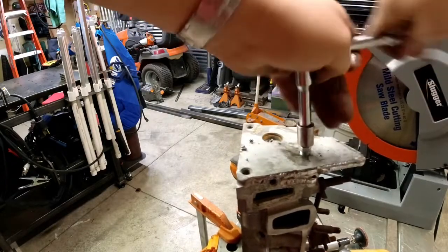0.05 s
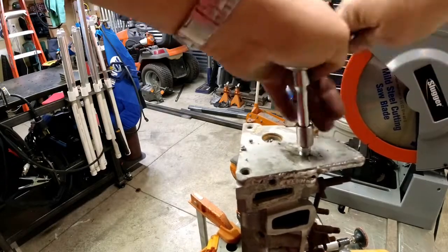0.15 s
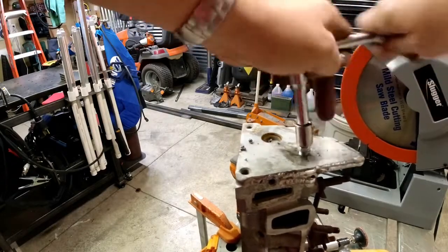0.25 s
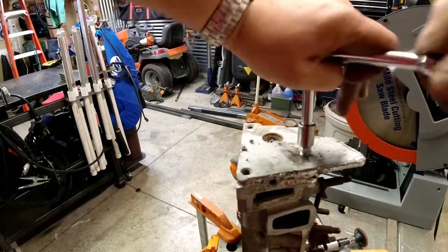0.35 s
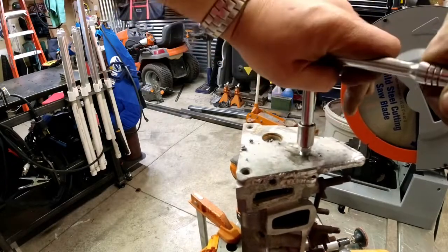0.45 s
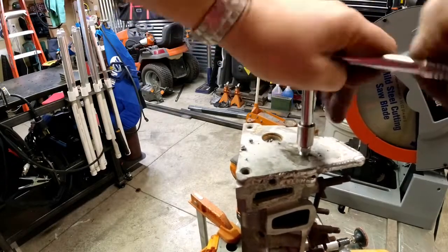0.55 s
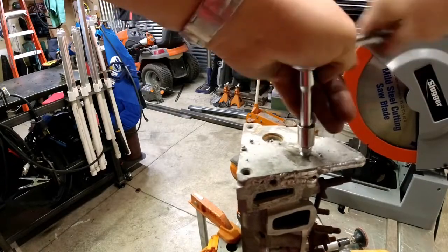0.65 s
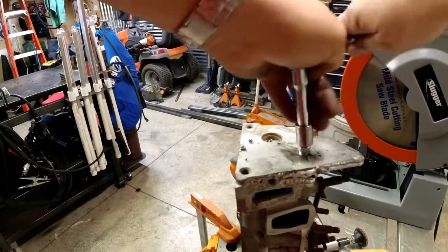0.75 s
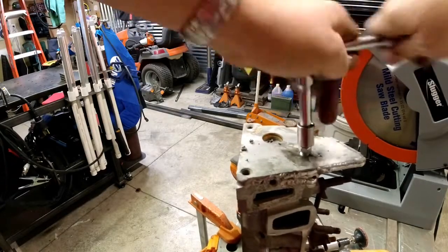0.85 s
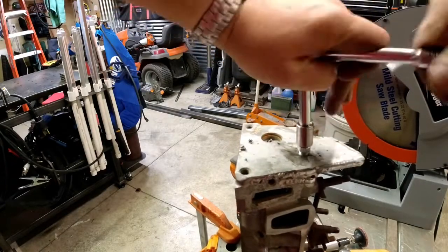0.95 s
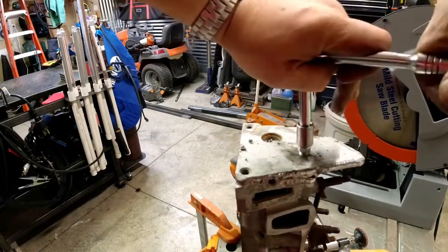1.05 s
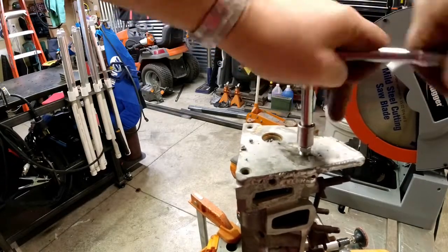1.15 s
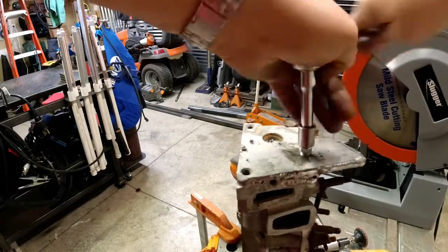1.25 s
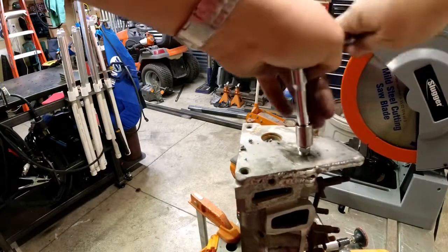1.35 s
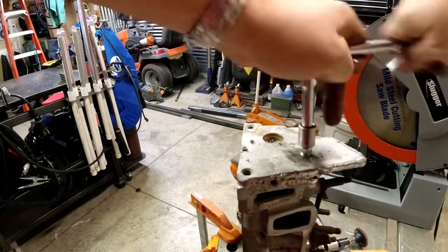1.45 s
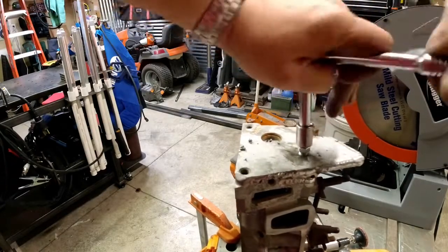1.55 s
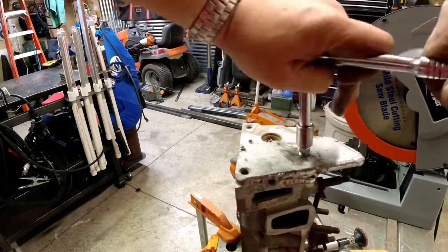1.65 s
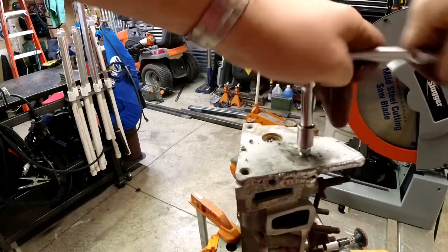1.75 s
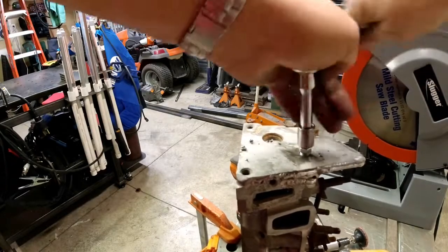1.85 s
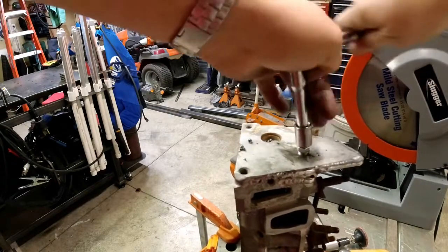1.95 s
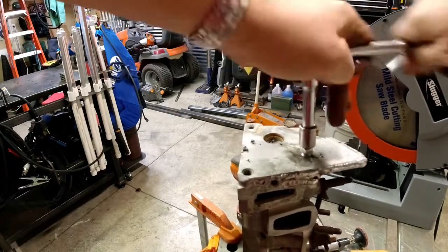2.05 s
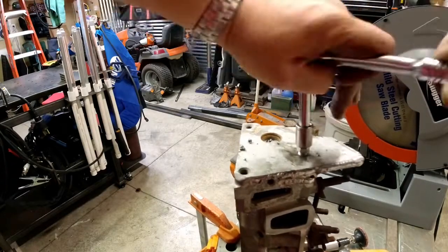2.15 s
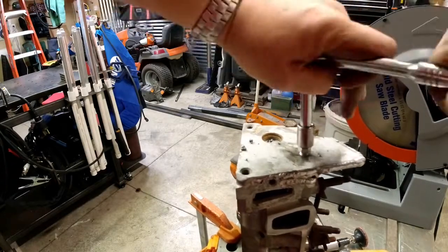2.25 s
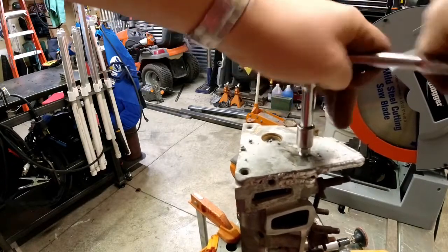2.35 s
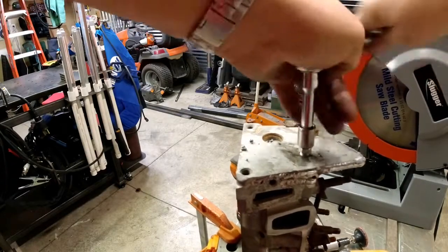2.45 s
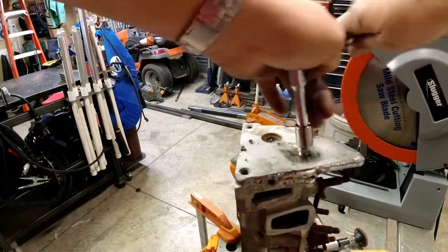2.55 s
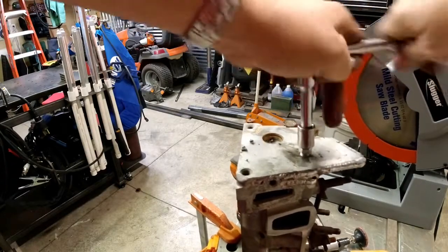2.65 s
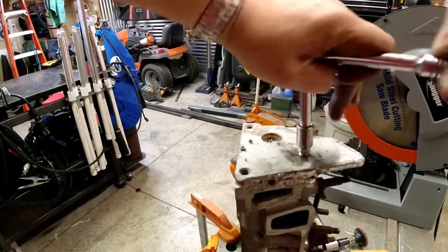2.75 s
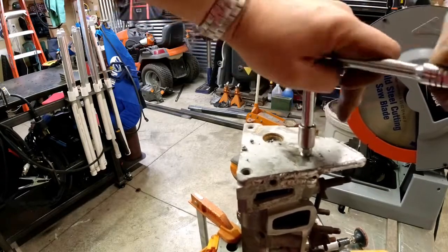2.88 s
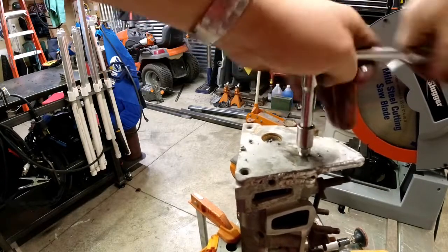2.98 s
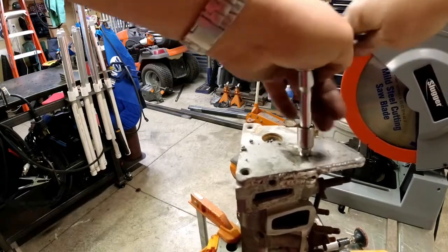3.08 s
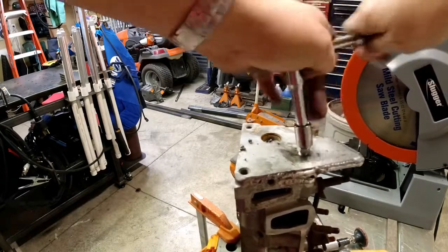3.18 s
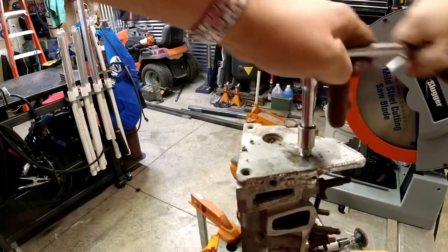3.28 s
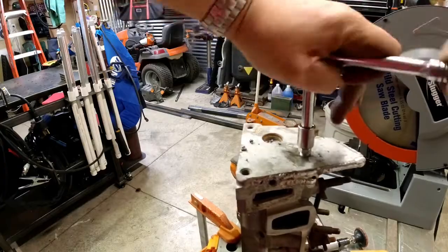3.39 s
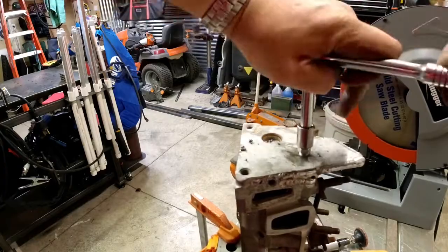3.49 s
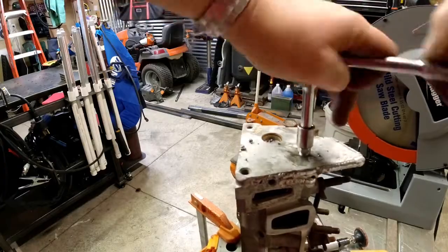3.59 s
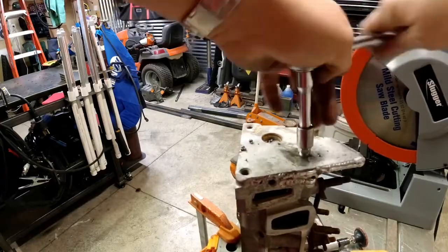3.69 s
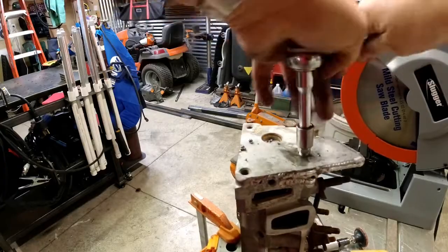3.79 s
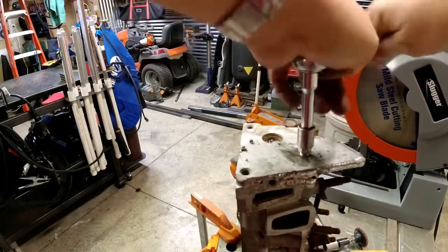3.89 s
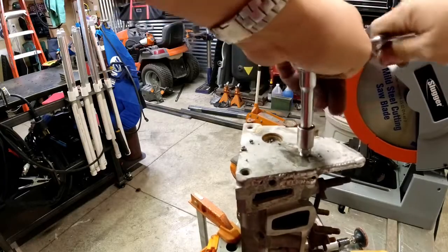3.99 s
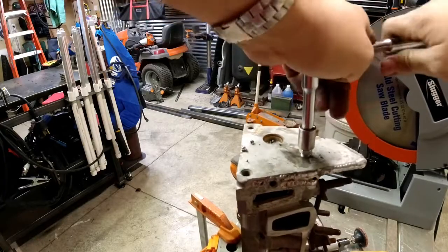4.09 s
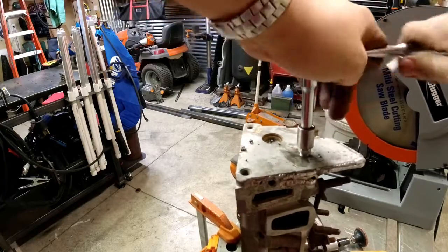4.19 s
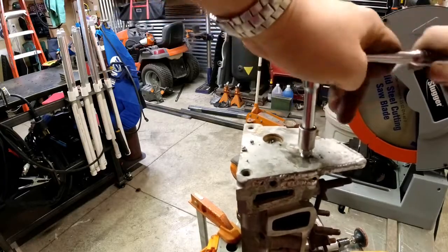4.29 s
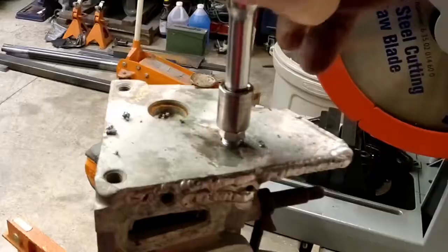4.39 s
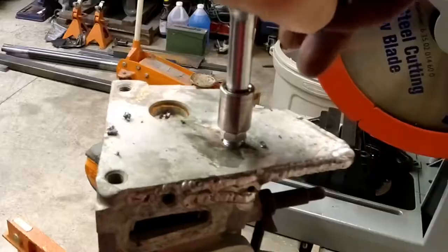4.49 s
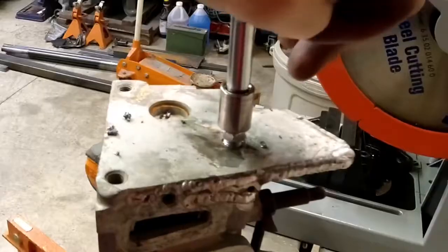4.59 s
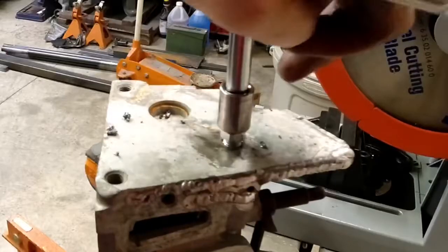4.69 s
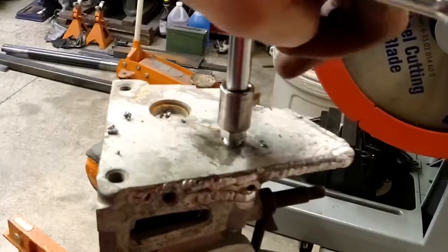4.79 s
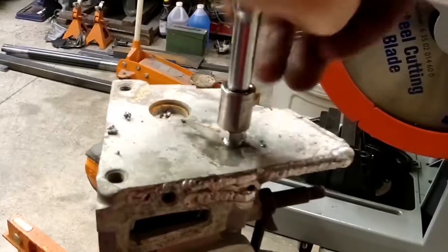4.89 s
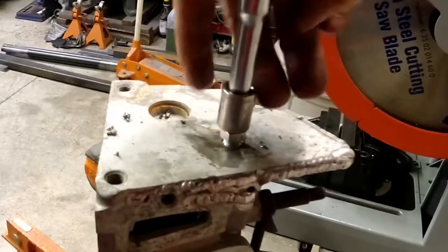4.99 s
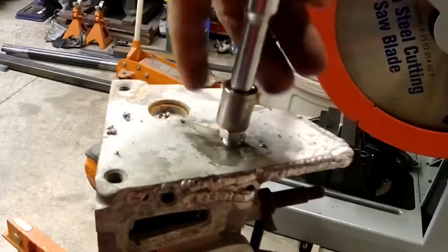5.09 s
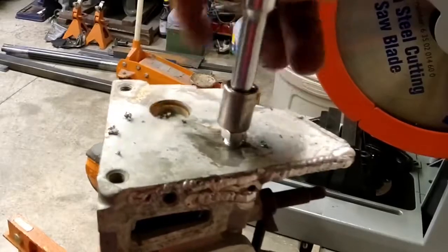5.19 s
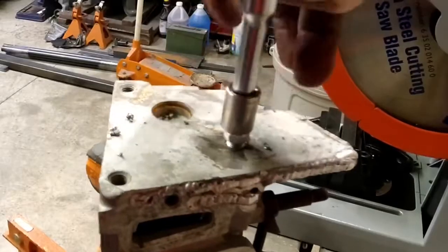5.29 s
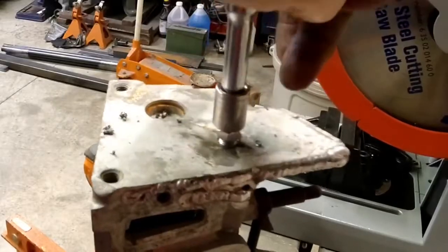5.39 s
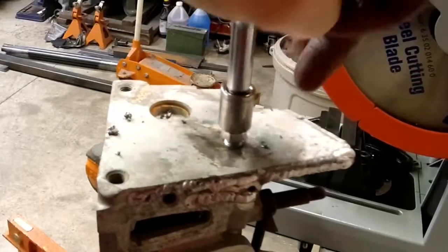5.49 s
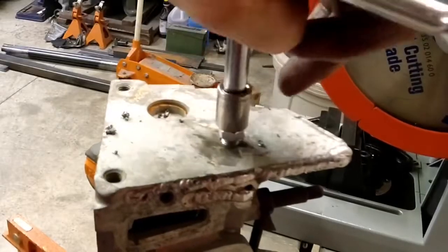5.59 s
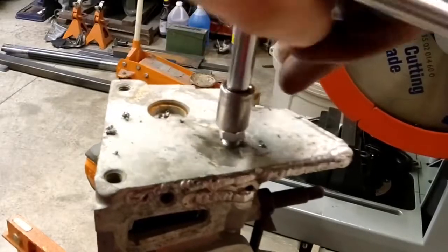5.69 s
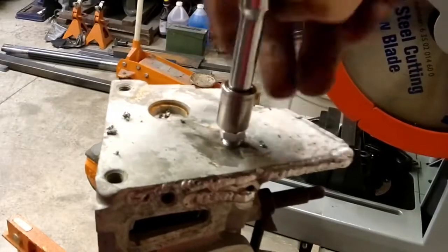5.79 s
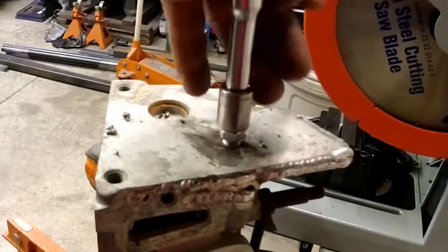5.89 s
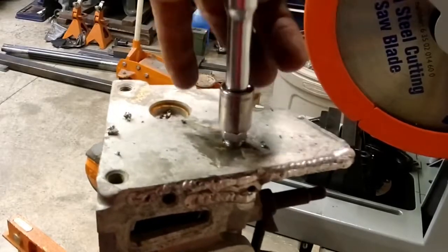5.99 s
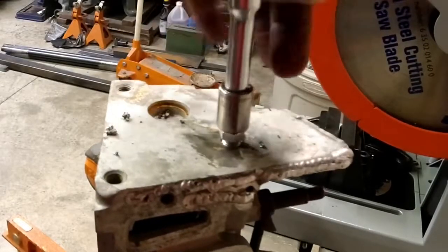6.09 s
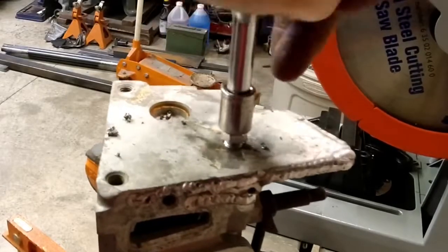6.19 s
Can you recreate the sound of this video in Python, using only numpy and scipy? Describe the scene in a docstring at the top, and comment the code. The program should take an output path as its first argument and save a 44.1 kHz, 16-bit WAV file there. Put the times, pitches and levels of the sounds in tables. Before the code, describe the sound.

Short bright zips of ratchet clicks repeat about twice a second, pause, then return slightly slower, amid dull metal clunks and low air thumps.

```python
"""Bursts of sharp metal clicks: a hand ratchet drives a bolt into a metal casting on a garage bench.
On each return swing the pawl skips over the teeth; each drop is shaped noise plus the ringing head.
Socket and extension bar knock as the load turns over, with noise and ringing tones; the thread grinds.
A sleeve brushes past as soft hiss, and the swinging arm pushes air at the microphone in low wobbles.
A short echo follows the tool, over a faint murmur and garage hush."""
import sys
import numpy as np
from scipy import signal
from scipy.fft import rfft, irfft, next_fast_len
from scipy.io import wavfile
from scipy.ndimage import uniform_filter1d

SR = 44100
rng = np.random.default_rng(int(sys.argv[2]) if len(sys.argv) > 2 else 0)


def pcm_store(signal):
    """Save signal as 16-bit PCM."""
    levels = np.round(np.clip(np.atleast_2d(signal), -1, 1) * 32767)
    wavfile.write(sys.argv[1], SR, levels.astype(np.int16).T)


N = 275184

# Levels in the tables are starting points: each function adds its own trims.

# Pawl dropping behind a tooth: start_s, blow_db, ring_db, place struck along the head (0-1),
# clack_pitch_hz, ring_length (share of the head's usual ring)
PAWL_DROPS = [(.058, -32.5, -24, 0.1, 4800, 1.8), (0.072, -32, -39, 0.3, 5400, .9),
              (.075, -35, -29.5, 0.2, 5630, 2.6), (0.085, -36, -28.5, 0.78, 4940, 0.77),
              (0.0899, -31, -34.5, 0.82, 5550, 0.85), (0.0975, -27, -32.5, .2, 5200, 1.3),
              (0.1117, -28.5, -26, 0.47, 5030, 1.4), (0.119, -40, -46.5, 0.8, 2700, .9),
              (0.1234, -27, -28, 0.6, 2390, 0.8), (0.1386, -32, -25, 0.2, 2650, 0.67),
              (0.1564, -28, -27.5, 0.56, 3880, 0.91), (0.6241, -31, -30, 0.67, 5100, .9),
              (.63, -34.5, -42.5, .17, 3400, 0.98), (0.6408, -30, -27, 0.64, 5150, 0.97),
              (0.654, -33, -28, 0.84, 5600, 1.1), (0.6675, -33.5, -32, 0.46, 2210, 1.2),
              (0.6806, -33, -28, 0.53, 4970, 1.44), (.693, -29.5, -34, .8, 4040, 1),
              (0.707, -27.5, -24.5, 0.1, 4660, 0.41), (0.7263, -29, -25.5, 0.63, 4330, 0.5),
              (.764, -28, -16.5, 0.18, 2250, 0.13), (1.2011, -31, -52, .15, 4220, 1.3),
              (1.215, -32.5, -45, 0.6, 4340, 1.4), (1.2222, -30, -31.5, 0.77, 3970, 1.7),
              (1.2365, -32.5, -36, 0.13, 5130, 0.95), (1.249, -28.5, -34.5, 0.6, 5000, 1.4),
              (1.26, -30, -30, 0.52, 5200, 2), (1.273, -36.5, -25.5, 0.1, 5100, 1.3),
              (1.2866, -33, -25, 0.19, 5800, 1.3), (1.3009, -32.5, -19.5, 0.16, 5900, 0.97),
              (1.323, -30, -20.5, 0.09, 5300, 0.96), (1.803, -29.5, -25.5, 0.24, 4700, 1.24),
              (1.8161, -29.5, -22, .78, 5340, 1.25), (1.8295, -31, -28, 0.9, 4100, 1.5),
              (1.841, -31, -28.5, 0.03, 1940, 3.1), (1.854, -29.5, -29.5, 1, 5540, 2.1),
              (1.869, -26.5, -27.5, 0.17, 1900, 1), (1.8833, -30, -19.5, .17, 1660, 1.35),
              (1.904, -29.5, -24.5, 0.15, 3700, 0.73), (2.409, -31, -22.5, 0.14, 4600, 0.93),
              (2.4252, -36, -27, 0.89, 4860, 1.2), (2.438, -31.5, -31, 0.85, 5100, 1.7),
              (2.4508, -32, -33.5, 0.42, 4080, 1.4), (2.4655, -36, -24.5, 0.99, 2180, 0.58),
              (2.478, -31.5, -28.5, 0.08, 1950, 1), (2.494, -31, -24, 0.15, 2470, 0.8),
              (2.515, -30, -22.5, 0.15, 2900, 0.98), (2.5648, -35.5, -28.5, 0.95, 5640, 0.57),
              (2.9895, -36.5, -46, .17, 3400, 1.3), (3.0125, -28.5, -35, 0.2, 4530, 1.3),
              (3.028, -43, -24.5, 0.82, 5240, 0.96), (3.04, -29.5, -36, 0.8, 5170, 1),
              (3.0465, -26.5, -30.5, 0.3, 5500, 0.8), (3.055, -31, -28.5, 0.5, 5380, 1.4),
              (3.0591, -29.5, -36, 0.4, 5660, 1.5), (3.0695, -26.5, -43.5, 0.5, 5500, 0.53),
              (3.0729, -28.5, -30, 0.36, 3860, 0.68), (3.087, -28, -32.5, .8, 5200, 0.69),
              (3.106, -28.5, -24, 0.8, 2180, 1.08), (3.1324, -28.5, -24, 0.96, 5110, 0.47),
              (3.6639, -32, -24.5, 0.88, 5070, .9), (3.68, -31.5, -20, 0.89, 4400, 1.26),
              (3.697, -33.5, -31, 0.37, 1850, 1.3), (3.7122, -33, -26.5, 0.12, 2100, 2.1),
              (3.7291, -30, -34.5, 0.64, 5300, 1.6), (3.749, -32.5, -25.5, 0.12, 5930, 1.3),
              (3.785, -29, -23.5, 0.11, 2220, 0.47), (3.9011, -32.5, -29.5, 0.52, 2860, 0.2),
              (4.947, -37, -69, .18, 4440, .9), (4.9675, -31.5, -34, 0.07, 4070, 1.7),
              (4.986, -37, -29.5, 0.47, 5540, 0.99), (5.003, -28.5, -38.5, 1, 2570, 1.6),
              (5.021, -27.5, -26.5, 0.01, 5180, 1.1), (5.039, -30, -28.5, .04, 5220, 1.4),
              (5.0558, -29, -25.5, 0.16, 5640, 1.8), (5.0729, -28, -22.5, 0.7, 4130, 1.17),
              (5.0887, -26, -30, 0.7, 4200, 1.5), (5.0966, -31, -40, 0.36, 3270, 0.94),
              (5.112, -28, -30.5, 0.62, 3490, 1.1), (5.1472, -28.5, -21.5, 0, 5430, 0.49),
              (5.8214, -35, -33, .16, 3370, 1.7), (5.8384, -36, -29.5, 0.69, 5300, 0.75),
              (5.8566, -31.5, -27, 0.36, 5150, 0.46), (5.8742, -34, -33, 0.47, 4400, 2.2),
              (5.8916, -34, -31, 0.51, 4100, 2.2), (5.9086, -30.5, -26, 0.75, 4100, 1.1),
              (5.925, -31.5, -24.5, 0.13, 4360, 1.75), (5.942, -31, -27, 0.17, 4000, 1.6),
              (5.9666, -35.5, -21.5, 0.18, 2830, 0.79)]
# Ring of the ratchet head, damped fast while the pawl bears on it:
# pitch_hz, t60_s (time to fall 60 dB), after_ring_t60_s (a fainter, usually longer ring)
HEAD_MODES = [(3714, 0.018, 0.036), (6816, 0.022, 0.84), (9590, 0.0023, 0.032), (10880, 0.012, 0.051),
              (15250, 0.008, 0.039), (9905, 0.011, 0.026), (5300, 0.013, 0.4)]
# How the first five head modes lie along the head: half_waves, loudest_place (0-1), level_db
HEAD_SHAPES = [(2.2, 0.17, -6.5), (2.06, .32, -7), (3.3, 0.05, 0), (1.59, .46, 3), (.51, .62, -5.5)]
# Colour of the snap in each click: pitch_hz, level_db
SNAP_TONE = [(800, -32), (2500, -6), (4300, 1.5), (5300, -3), (8000, -3), (10000, -23.5), (16500, -59)]
# Colour of the duller thud: pitch_hz, level_db
THUD_TONE = [(400, -32), (900, -4), (1400, -1.5), (2200, -1), (3100, -10), (8000, -60.5)]
# Colour of the bright crack: pitch_hz, level_db
CRACK_TONE = [(7000, -24.5), (8600, 3), (12000, -5), (13500, -11), (15600, -9), (16300, -35.5),
              (17000, -41)]
# Colour of the gritty noise in the knocks and just before each click: pitch_hz, level_db
SCRAPE_TONE = [(300, -22), (900, 1), (2000, -0.5), (4000, 1.5), (7000, -8.5), (10000, -21), (15000, -29.5)]
NODE_LEAK = 0.011  # share of a mode still heard when struck on a node, its still point
CLACK_DB, CLACK_T60_S = 14.5, 0.0065  # level above the blow
THUD_DB, THUD_DB_PER_OCTAVE = -5.5, -1.5  # the thud weakens as the clack gets lower
SWELL_DB, SWELL_S = -20, 0.0078  # faint noise swelling just before each click
BRIGHT_SWELL_DB = -27  # level of the bright noise swelling just before each click
DETUNE = .004  # spread of mode pitch from tooth to tooth, as a share at 9000 Hz
FLUTTER_DB = 6  # the loose pawl chatters on the head and breaks up its after-ring
HEAD_WANDER_RAD = 0.63  # loose contact shakes the phase of the head's ring
ONSET_S = 0.00056  # each click starts with a brief smooth rise
RATTLE_DB, RATTLE_T60_S = -27, 0.15  # loose parts in the head rattle on after a drop


def pawl():
    """Each drop is a short snap, clack and thud; the head rings in a blend set by where the tooth strikes."""
    out, t = np.zeros(N), np.arange(8000) / SR
    chatter = amp(FLUTTER_DB * lumps(size=150))
    before = np.arange(-900, 0) / SR  # time leading up to the click
    shake = HEAD_WANDER_RAD * lumps(size=120)
    onset = 1 - np.exp(-(t / ONSET_S) ** 2)
    half_waves, loudest, shape_db = np.transpose(HEAD_SHAPES)
    for s, blow_db, ring_db, place, clack_hz, share in PAWL_DROPS:
        detune, phases, luck, grip = rng.standard_normal((4, len(HEAD_MODES)))
        share = np.clip(share, .2, 3)
        reach = abs(np.cos(np.pi * half_waves * (place - loudest)))
        mode_db = ring_db + shape_db + 20 * np.log10(reach + NODE_LEAK)
        bright_db = max(mode_db[2:4])  # a sharp strike wakes the upper modes and the crack together
        # the last two modes follow the third mode and the blow, with some chance
        mode_db = [*mode_db, mode_db[2] - 0.5 + 3 * luck[1], blow_db - 12.5 + 5 * luck[2]]
        flutter = excerpt(chatter, len(t))

        swell = amp(blow_db + SWELL_DB) * hiss(SCRAPE_TONE, count=900)
        swell += amp(bright_db + BRIGHT_SWELL_DB) * hiss(CRACK_TONE, count=900)
        add(out, s + before[0], swell * np.exp(before / SWELL_S) * flutter[-900:])

        # a hard spike and a longer body
        blow = fade(t, 0.011, 0.00057) + 2.4 * fade(t, 0.0037, 0.00052)
        # the sprung pawl rebounds weakly, a few milliseconds later
        for wait, size in rng.random((3, 2)):
            since_rebound = np.maximum(t - .0015 - 0.0063 * wait, 0)
            blow = blow + 0.23 * min(share, 1) * size * fade(since_rebound, 0.0035, 0.00012)

        rattle = amp(RATTLE_DB) * fade(t, RATTLE_T60_S, .002) * flutter
        sound = amp(blow_db + 3.5) * hiss(SNAP_TONE, count=len(t)) * (blow + rattle)
        clack = np.sin(2 * np.pi * clack_hz * t) * fade(t, CLACK_T60_S, 0.00059)
        sound += amp(blow_db + CLACK_DB) * clack
        sound += amp(bright_db - 3.0) * hiss(CRACK_TONE, count=len(t)) * blow
        thud_db = blow_db + THUD_DB + THUD_DB_PER_OCTAVE * np.log2(5000 / clack_hz)
        thud_tail = 0.55 * min(share, 1) * fade(t, 0.11, 0.014) * flutter
        sound += amp(thud_db) * hiss(THUD_TONE, count=len(t)) * (blow + thud_tail)

        for (hz, t60, late), db, d, phase, g in zip(HEAD_MODES, mode_db, detune, phases, grip):
            # every tooth seats a little differently, so each mode rings its own length and strength
            shape = fade(t, t60 * share * 1.31 ** g, 0.0012)
            shape += 0.012 * share ** 2 * fade(t, late, 0.0011) * (1 - t / t[-1]) * flutter
            tuned_hz = hz * (1 + DETUNE * d * np.sqrt(9000 / hz))
            tone = np.sin(2 * np.pi * (tuned_hz * t + phase) + excerpt(shake, len(t)))
            sound += amp(db + 11 + 1.4 * g - 3 * np.log10(share)) * tone * shape
        add(out, s - .0008, sound * onset)
    return out


# Slack in the socket taken up: start_s, tick_db, scrape_db, bump_db,
# centre_hz (where the casting answers most)
SOCKET_KNOCKS = [(0.0044, -30, -35, -50, 2090), (0.0339, -27.5, -32.5, -64, 1300),
                 (0.2528, -32.5, -30.5, -50.5, 1180), (0.2733, -24.5, -38, -52, 756),
                 (0.4615, -51, -42, -80, 655), (0.553, -40, -34, -43, 1130), (0.599, -30, -27, -49, 1010),
                 (.745, -26, -59, -75, 1980), (0.832, -25, -47, -42, 1400), (0.855, -31, -45.5, -55.5, 740),
                 (1.1537, -43, -26, -50, 1940), (1.4386, -25.5, -40, -52, 900),
                 (1.736, -31.5, -20, -42.5, 1870), (1.964, -45, -65.5, -46.5, 1094),
                 (2.0083, -30.5, -42, -53.5, 2030), (2.156, -66, -75, -52.5, 1204),
                 (2.3327, -41, -41.5, -50.5, 965), (2.363, -53, -55.5, -46, 1280),
                 (2.3887, -40, -30, -54, 953), (2.616, -29, -50, -44, 1490),
                 (2.6226, -21.5, -35, -44.5, 1500), (2.771, -69, -86, -57, 1190),
                 (2.949, -27, -27, -49.5, 1380), (3.169, -42, -73, -51, 1280),
                 (3.2226, -26, -55, -53.5, 1670), (3.2387, -29, -63, -58.5, 1920),
                 (3.2539, -36, -49.5, -48.5, 1750), (3.3402, -70, -53, -65, 767),
                 (3.368, -70, -71, -54, 955), (3.589, -43, -41, -53, 1760), (3.6178, -24.5, -35, -51, 1880),
                 (3.865, -36, -52.5, -87, 2070), (3.9437, -47, -40, -54.5, 1255),
                 (3.9889, -33.5, -67, -54.5, 1327), (4.425, -55.5, -51, -77, 1490),
                 (4.7183, -38, -76, -71, 1740), (4.902, -55, -47, -47.5, 1097),
                 (5.212, -24, -39.5, -53, 1180), (5.2411, -29, -56, -46.5, 1470),
                 (5.325, -43.5, -42.5, -61.5, 830), (5.4866, -45.5, -59, -63, 1655),
                 (5.5413, -65, -72.5, -57.5, 563), (5.642, -76, -84, -63, 520),
                 (5.697, -49.5, -49, -71.5, 440), (5.729, -70.5, -79, -56, 560),
                 (5.7666, -39, -37, -48, 1086), (5.7941, -30, -28, -50, 1320),
                 (5.993, -29, -49.5, -61.5, 1500), (6.0668, -36, -52, -80, 1490),
                 (6.103, -39, -61.5, -66, 1500), (6.0797, -26, -42, -62, 1440),
                 (6.122, -32.5, -40.5, -52.5, 1113), (6.141, -48.5, -71.5, -48.5, 1130)]
# Extension bar and casting ringing after a knock: pitch_hz, level_db, t60_s
BAR_MODES = [(433.5, 12, 0.12), (554, -7, 0.037), (749.5, 1, 0.25), (1022, -7, 0.21), (1400, -1, 0.12),
             (1850, -5.5, 0.18), (1944, -2, 0.32), (5220, -15, 0.092)]
TICK_RING_DB, TICK_T60_S = 5.5, 0.01  # a tick also wakes the first listed mode of the head
KNOCK_RISE_S, BODY_T60_S = 0.0015, 0.22
SOFT_CUT_S = 0.109  # the softest knock's bump noise has its t60 shortened by this much
BAR_WANDER_RAD = .5  # loose contact shakes the phase of the bar's ring
BOUNCE_S = 0.034  # a knocked socket makes its bounces within this time


def socket():
    """Each knock is a tick with a gritty scrape behind it, a dull bump, and the bar ringing."""
    out, t = np.zeros(N), np.arange(9000) / SR
    grit = amp(4 * lumps(size=90))  # loose parts rattle, so the noise comes in grains
    shake = BAR_WANDER_RAD * lumps(size=400)
    for s, tick_db, scrape_db, bump_db, centre_hz in SOCKET_KNOCKS:
        phases, rattle = rng.random(len(BAR_MODES)), excerpt(grit, len(t))
        shape = amp(tick_db - 12) * fade(t, 0.011, 0.00046)
        shape += amp(scrape_db - 20.5) * fade(t, 0.22, 0.0052) * rattle
        sound = hiss(SCRAPE_TONE, count=len(t)) * shape
        tick_tone = np.sin(2 * np.pi * HEAD_MODES[0][0] * t) * fade(t, TICK_T60_S, 0.0021)
        sound += amp(tick_db - 16.0 + TICK_RING_DB) * tick_tone

        soft = np.clip((bump_db - tick_db) / 12, 0, 1)  # 0 metal on metal, 1 a cushioned thud
        hump = [(centre_hz / 4, -22), (centre_hz, 0), (centre_hz * 4, -32), (12000, -60)]
        bump_shape = fade(t, BODY_T60_S - SOFT_CUT_S * soft, KNOCK_RISE_S) * rattle
        body = amp(bump_db - 4) * hiss(hump, count=len(t)) * bump_shape
        for (hz, db, t60), phase in zip(BAR_MODES, phases):
            # modes near the centre answer most; the top mode is judged by the pitch of the one below
            away_db = 16 * abs(np.log2(min(hz, BAR_MODES[-2][0]) / centre_hz))
            if hz == BAR_MODES[0][0]:
                away_db *= 1 - .5 * soft  # a soft knock wakes the lowest mode more easily
            # the scrape drives the top mode, the bump all the others
            level_db = (bump_db if hz < 3000 else scrape_db) + db - away_db
            tone = np.sin(2 * np.pi * (hz * t + phase) + excerpt(shake, len(t)))
            body += amp(level_db) * tone * fade(t, t60, KNOCK_RISE_S) * np.sqrt(rattle[::-1])
        add(out, s, sound + body)
        for wait, size in rng.random((3, 2)):  # each bounce is a short clunk of the same body
            add(out, s + BOUNCE_S * wait, size * body[:900] * amp(-60 * t[:900] / 0.056))
    return out


# Thread and grip creak most as a swing ends or the hand shifts: peak_s, level_db
GRIND_PEAKS = [(0.08, -55), (.76, -62.5), (1.34, -67), (1.91, -53.5), (2.54, -56.5), (3.14, -54),
               (3.82, -66.5), (4.02, -77), (4.5, -77), (5.09, -56.5), (5.89, -57.5)]
# Colour of the grinding: pitch_hz, level_db
GRIND_COLOUR = [(150, -42), (260, 2), (600, 3.5), (1400, 8.5), (2400, -5), (3500, -20.5), (7000, -22.5),
                (11000, -51)]
SING_DB, SING_WIDTH_HZ = 13.5, 6.9  # the grinding makes the bar and casting sing at their low modes
GRIND_RISE_DB_PER_S, GRIND_FALL_DB_PER_S = 111, 65
MURMUR_DB = -87.5  # faint background murmur, uneven in time and pitch


def thread():
    """Grinding noise in quick lumps, coloured by the bar's low modes, over a faint uneven murmur."""
    size = next_fast_len(N)
    t, hz = np.arange(N) / SR, np.fft.rfftfreq(size, 1 / SR)
    load = np.zeros(N)
    for s, db in GRIND_PEAKS:
        slope = np.where(t < s, GRIND_RISE_DB_PER_S, GRIND_FALL_DB_PER_S)
        load += amp(db - slope * abs(t - s))
    resonances = sum(1 / (1 + ((hz - f) / SING_WIDTH_HZ) ** 2) for f, db, t60 in BAR_MODES[:3])
    sing = 1 + amp(SING_DB) * resonances
    grain = hiss(GRIND_COLOUR)
    murmur = amp(MURMUR_DB) * patchy(grain, spread_db=7.0)
    singing = evened(irfft(rfft(grain, size) * sing, size)[:N])
    return load * amp(2.2 * lumps(size=500)) * singing + murmur


# Sleeve brushing past: middle_s, level_db, length_s
SLEEVE_BRUSHES = [(0.435, -71.5, 0.099), (1.015, -71, 0.049), (1.615, -76.5, 0.11), (2.205, -69, 0.062),
                  (2.809, -68, 0.06), (3.43, -75, 0.07)]
# Colour of the cloth: pitch_hz, level_db
CLOTH_TONE = [(1500, -17), (3500, -18), (5200, -7.5), (7000, -17.5), (13000, -24.5), (15500, -47)]


def sleeve():
    """Cloth rubbing past gives noise in soft swells."""
    t = np.arange(N) / SR
    swells = sum(amp(db) * np.exp(-(2 * (t - s) / length) ** 2) for s, db, length in SLEEVE_BRUSHES)
    return hiss(CLOTH_TONE) * swells


# Air pushed at the microphone: start_s, level_db, starting_pitch_hz (it slows from there), t60_s
AIR_PUSHES = [(-.04, -41.5, 13.2, 0.97), (0.267, -52.5, 160, 0.087), (0.418, -32.5, 13, 0.73),
              (1.448, -48, 39, 0.1), (1.629, -42.5, 14.6, 0.5), (2.231, -31.5, 14.6, 0.57),
              (2.845, -37, 14.4, 0.86), (4.776, -15.5, 16.2, 0.085), (4.814, -23.5, 13.3, 0.55),
              (5.237, -43, 34, 0.29), (5.64, -35.5, 15.1, 0.61), (6.139, -47, 45, 0.12)]
# Colour of the slow draught: pitch_hz, level_db
DRAUGHT_TONE = [(4, 9), (15, -4), (40, -6.5), (80, -8), (110, -24.5), (200, -58.5)]
STIR_DB = -58  # slow draught on the microphone


def draught():
    """Each push of air bows the diaphragm out slowly, lets it drop back fast, and it settles."""
    t = np.arange(SR // 2) / SR
    out = amp(STIR_DB + 1.2 * lumps(size=5000)) * hiss(DRAUGHT_TONE)
    for s, db, hz, t60 in AIR_PUSHES:
        phase = 2 * np.pi * hz * t / (1 + 3.6 * t)
        wobble = np.sin(phase) - 1.1 * np.sin(2 * phase)
        add(out, s, amp(db + 3.0) * wobble * fade(t, t60, 0.016))
        # the push breaks into eddies that rumble while it lasts
        eddies = hiss([(60, -4.0), (500, -39.5), (3000, -110)], count=len(t))
        add(out, s, amp(db - 14.5) * eddies * fade(t, t60, 0.022))
    return out


# How fast the room's echo dies at each pitch: pitch_hz, t60_s
WALL_FADES = [(500, 0.4), (1300, 0.15), (3500, 0.084), (9000, 0.074), (15000, 0.016)]


def garage(x):
    """Echo made of sparse taps of random sign, each band dying at its own speed."""
    taps, at = np.zeros(SR // 2), np.arange(150, SR // 2 - 20, 20)
    taps[at + rng.integers(0, 20, len(at))] = rng.choice([-1., 1.], len(at))
    hz, t, z = signal.stft(taps, SR, nperseg=256)
    fall_db = 60 * t / read(WALL_FADES, hz)[:, None]
    # near walls die fast, the far end lingers faintly
    fall = amp(-fall_db) + 0.091 * amp(-fall_db / 5.5)
    tail = signal.istft(z * fall, SR, nperseg=256)[1]
    return signal.fftconvolve(x, tail / np.linalg.norm(tail))[:N]


# Colour of the garage hush: pitch_hz, level_db
HUSH_TONE = [(60, -28.5), (100, 0.5), (180, -9.5), (400, -5.5), (540, -18.5), (1400, -36.5), (2500, -27.5),
             (12000, -42.5), (13000, -53.5)]
HUSH_DB = -69


def hush():
    """The garage's faint background air is steady noise with a slightly drifting level."""
    return amp(HUSH_DB + 2.0 * lumps(size=3000)) * hiss(HUSH_TONE)


def amp(db):
    """Decibels to gain."""
    return 10 ** (np.asarray(db) / 20)


def evened(x):
    """Scales to rms 1."""
    return x / np.sqrt(np.mean(x ** 2) + 1e-20)


def read(points, hz):
    """Reads a table by pitch, on a log-frequency axis."""
    f, value = np.transpose(points)
    return np.interp(np.log(hz + 1), np.log(f + 1), value)


def hiss(points, count=N):
    """Noise of rms 1 with the given spectrum."""
    size = next_fast_len(count)
    gain = amp(read(points, np.fft.rfftfreq(size, 1 / SR)))
    return evened(irfft(rfft(rng.standard_normal(size)) * gain, size)[:count])


def add(mix, s, sound):
    """Mixes a sound in at a time; what falls before zero is dropped."""
    at = round(s * SR)
    part = mix[max(at, 0):][:len(sound) + min(at, 0)]
    part += sound[max(-at, 0):][:len(part)]


def fade(t, t60, rise):
    """Quick rise, exponential fall."""
    return (1 - np.exp(-t / rise)) * amp(-60 * t / t60)


def lumps(size):
    """Slow chance of rms 1 that changes over about size samples."""
    return evened(uniform_filter1d(uniform_filter1d(rng.standard_normal(N), size), size))


def excerpt(x, count):
    """Takes a stretch of x from a random place."""
    return x[rng.integers(N - count):][:count]


def patchy(x, spread_db):
    """Drifting louder and softer patches in time and pitch."""
    z = signal.stft(x, nperseg=512)[2]
    field = uniform_filter1d(rng.standard_normal(z.shape), size=4, axis=0)
    field = uniform_filter1d(field, size=8, axis=1)
    return signal.istft(z * amp(spread_db * evened(field)), nperseg=512)[1][:N]


def scene():
    """The tool with its room echo, then the soft sounds near the microphone and the hush."""
    tool = pawl() + socket()
    echo = amp(-12.5) * garage(tool)
    return (tool + echo + thread() + sleeve() + draught() + hush())[None]


EDGE_HZ = 16550  # the treble stops here


def record(dry):
    """A steep low-pass filter sets the band limit."""
    low_pass = signal.firwin(511, EDGE_HZ, window=("kaiser", 9), fs=SR)
    return signal.oaconvolve(dry, low_pass[None], "same")


dry = scene()
out = record(dry)
pcm_store(out)
```